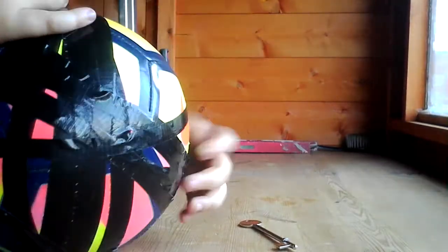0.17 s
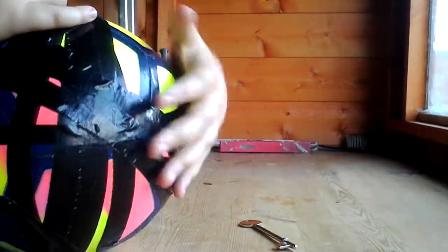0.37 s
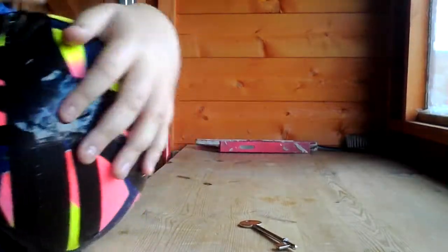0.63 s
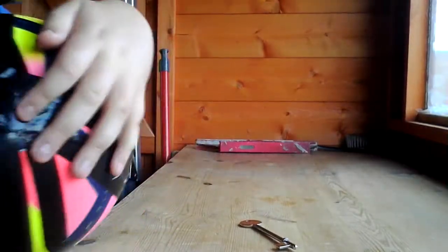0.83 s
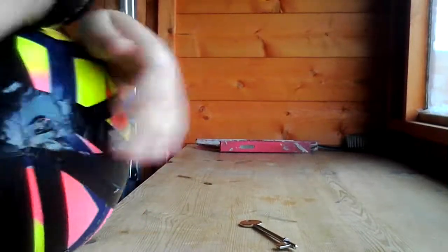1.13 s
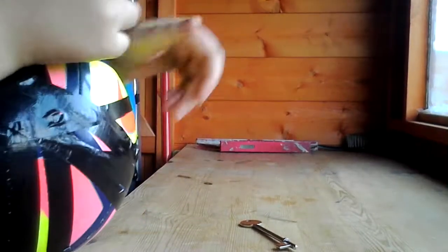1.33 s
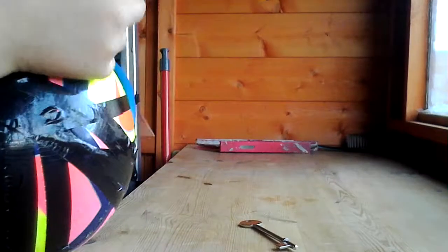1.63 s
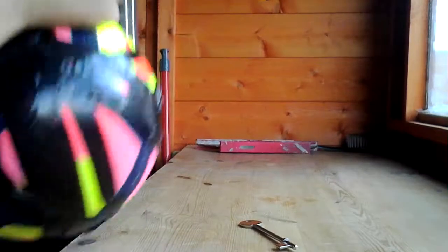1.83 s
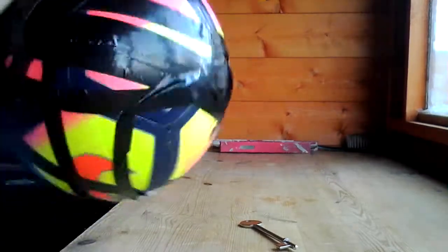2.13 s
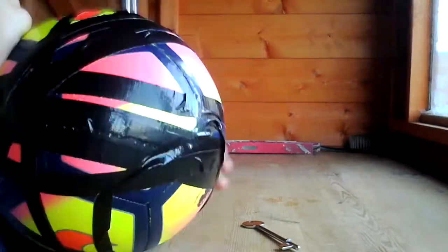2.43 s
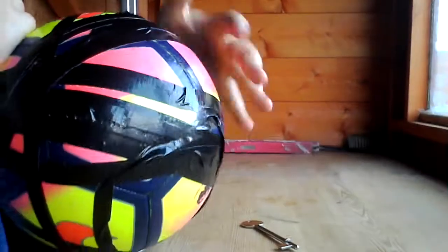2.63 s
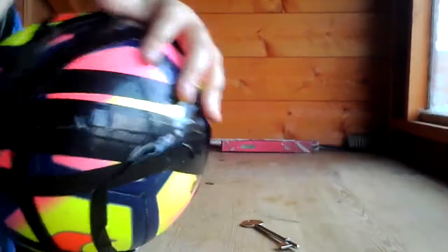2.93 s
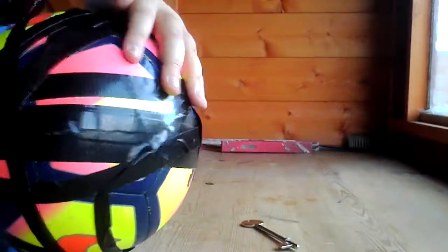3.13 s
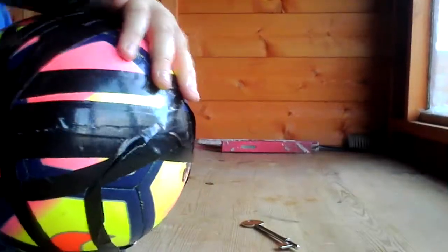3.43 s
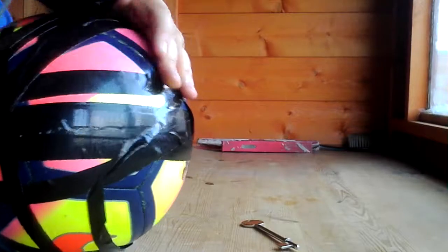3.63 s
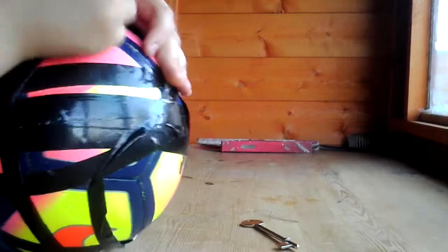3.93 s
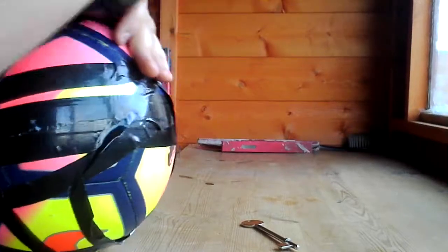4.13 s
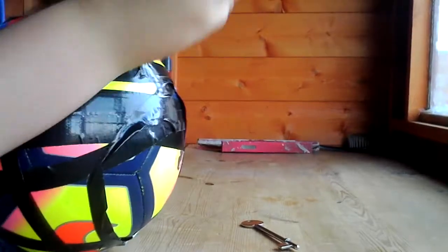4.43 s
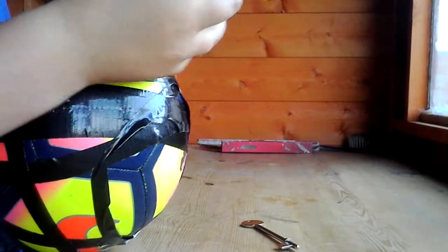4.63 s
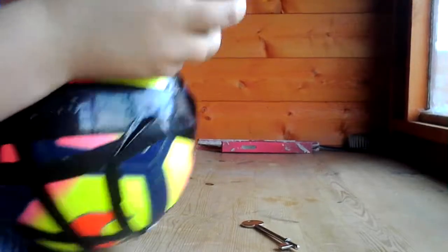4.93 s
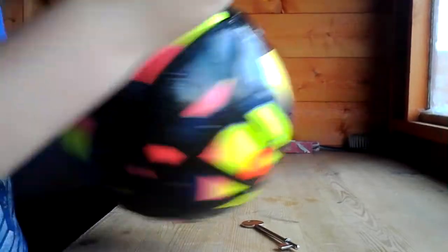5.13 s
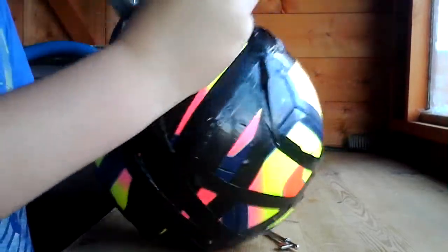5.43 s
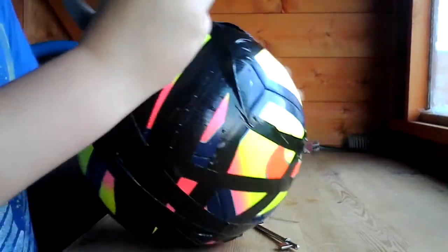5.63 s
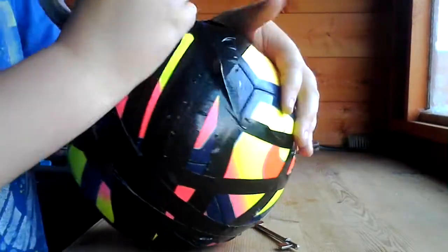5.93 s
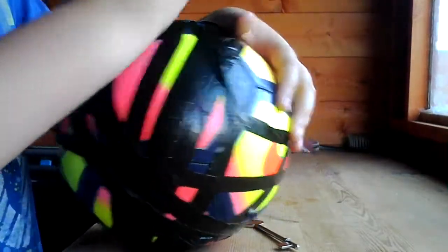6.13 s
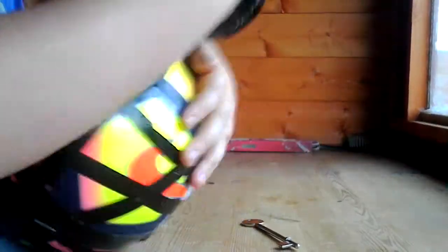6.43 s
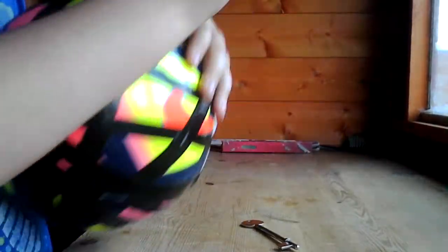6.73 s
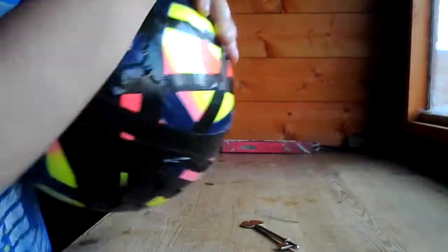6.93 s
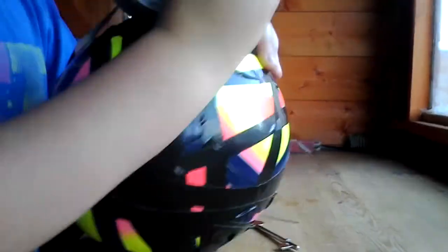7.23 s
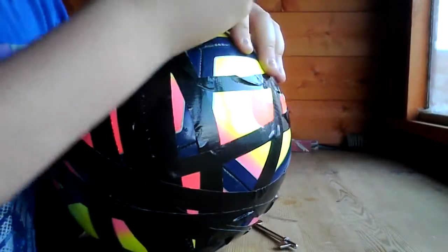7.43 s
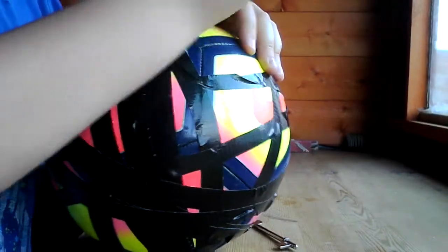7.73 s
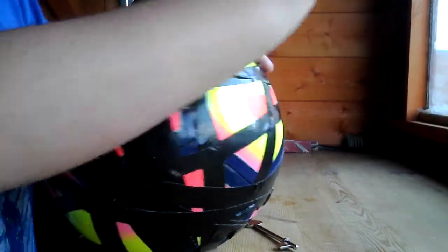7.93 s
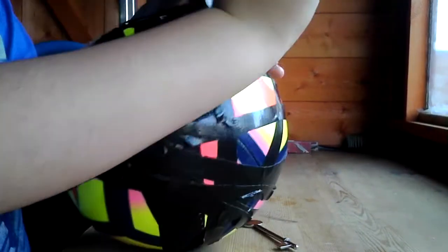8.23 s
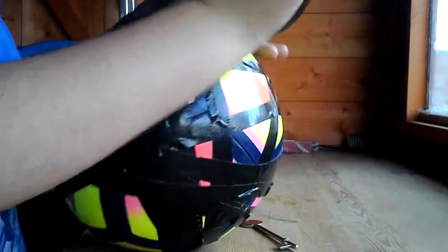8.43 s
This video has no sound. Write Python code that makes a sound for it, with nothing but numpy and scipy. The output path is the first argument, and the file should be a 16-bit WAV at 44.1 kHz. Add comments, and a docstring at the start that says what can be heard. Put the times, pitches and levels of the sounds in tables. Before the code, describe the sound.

Close in a small wooden shed, with low rumble, dull rush and faint hiss throughout. At first only very faint hand rubbing. At 0.8 s the slack tape jerks with dull snaps and a short crackling rip follows until about 1.0. Quiet rubbing and small creases lead to a ball being set on the bench at 2.5, a low thud with a scrape and swish. From 2.95 to 3.55 come four brisk rips, bright and crackling, with hard snaps and a drumming strip. Soft rubbing, then a faint skid and thin falling squeak near 4.0, a rip at 4.1 to 4.3 and a tiny one at 4.5. A soft thud at 5.0, then light brushing. Two strong rips at 6.2 and 6.4, swishes and hollow taps around 6.9, a firmer ball bump at 7.3, a last longer rip at 7.8 to 8.0, then quiet rubs and a swish at 8.5.

```python
"""Tape is pulled off a roll in short rips and wound round a football on a wooden bench in a small shed.
The glue lets go in sharp slips and a dense crackle, coloured noise that also drums on the taut strip.
Between rips, hands rub, crease and tap the tape, and the ball skids, squeaks and is bumped on the bench;
damped low tones make its thuds, filtered noise its clatter. Short echoes, hiss and rumble lie behind."""
import sys
import numpy as np
from scipy import signal
from scipy.fft import rfft, irfft
from scipy.io import wavfile
from scipy.ndimage import uniform_filter1d

SR = 44100
rng = np.random.default_rng(int(sys.argv[2]) if len(sys.argv) > 2 else 0)


def wav_out(sig):
    """Save sig, one row per channel (or a flat mono array), as 16-bit PCM at SR to the path in sys.argv[1]."""
    wavfile.write(sys.argv[1], SR, np.round(np.clip(np.atleast_2d(sig).T, -1, 1) * 32767).astype(np.int16))


N = 378378

# Colour of the taut strip. Each row: frequency in Hz, relative density in dB per Hz.
STRIP_COLOUR = [(60, -15), (160, -8), (330, -7), (520, -7), (730, -2), (920, -6.5), (1130, -5), (1350, -8),
                (1800, -8), (3000, -9), (8000, -22)]
# Colour of the glue letting go. Each row: frequency in Hz, relative density in dB per Hz.
GLUE_COLOUR = [(150, -18), (600, -9), (1500, -17), (2000, -13), (2500, -4.5), (4200, -2.5), (5400, 0.5),
               (6500, 2), (7300, -6), (8500, -8), (11800, -2), (15400, -12)]
# Colour of skin on tape and of creases. Each row: frequency in Hz, relative density in dB per Hz.
SWISH_COLOUR = [(300, -13), (1500, -11.5), (2500, -9), (3600, -4), (6200, 3), (8000, -11.5), (12000, -5.5),
                (15500, -16)]


def from_db(db):
    """Decibels to gain."""
    return 10 ** (np.asarray(db) / 20)


def unit_energy(x):
    """Scale so that the squares sum to one."""
    return x / np.sqrt(np.sum(x ** 2) + 1e-20)


def at_hz(points, hz):
    """Read a table on a log-frequency axis."""
    f, value = np.transpose(points)
    return np.interp(np.log(np.maximum(hz, 1)), np.log(f), value)


def add(out, s, sound):
    """Mix a sound in at time s."""
    i = max(round(s * SR), 0)
    out[i:i + len(sound)] += sound[:max(N - i, 0)]


def fade(t, t60):
    """Exponential decay by 60 dB in t60 seconds."""
    return np.exp(-np.log(1000) * t / t60)


def colour(x, spectrum, size=4096):
    """Causal (minimum-phase) filter with this spectrum; white noise keeps its power."""
    hz = np.arange(size // 2 + 1) * SR / size
    cepstrum = irfft(np.log(from_db(at_hz(spectrum, hz))))
    # folding the cepstrum forward in time makes the phase minimal
    cepstrum[1:size // 2] *= 2
    cepstrum[size // 2 + 1:] = 0
    response = unit_energy(irfft(np.exp(rfft(cepstrum))))
    return signal.oaconvolve(x, response)[:N]


def wander(per_s, count=1000):
    """Slow chance with a spread of about one, drawn per_s times a second and joined by straight lines."""
    return np.interp(np.arange(N) / SR * per_s, np.arange(count), rng.standard_normal(count))


def crackle(per_s, spread_db, size=1024):
    """Random clicks of uneven strength, evened to about unit power over some 20 ms."""
    sign = rng.choice([-1, 1], N)
    strength = from_db(spread_db * np.clip(rng.standard_normal(N), -2, 2)) * sign
    clicks = strength * (rng.random(N) < per_s / SR)
    power = np.abs(uniform_filter1d(clicks ** 2, size))
    return clicks / np.sqrt(power + 0.0013)


def cracks(rows, spectrum, crack_t60, rise_s=0.00049, size=512):
    """Each row is a rough burst that builds and dies within milliseconds, in the colour of what it shakes."""
    out, t = np.zeros(N), np.arange(size) / SR
    shape = np.minimum(t / rise_s, 1) * fade(t, crack_t60)
    for (s, db), grain in zip(rows, rng.standard_normal((len(rows), size))):
        burst = colour(np.tanh(2 * grain) * shape, spectrum, size=1024)
        add(out, s, from_db(db) * unit_energy(burst))
    return out


def stick_slip(per_s, jitter, slip_t60, steady, uneven_db=2.0, most=4.2, count=200):
    """Gain of a peel front that jumps unevenly at a changing rate and creeps between; about unit power."""
    timing, grip = rng.standard_normal((2, count))
    gaps = np.exp(jitter * timing)
    stored = gaps * from_db(uneven_db * grip) ** 2   # a longer or firmer stick stores more energy
    at = np.searchsorted(np.cumsum(per_s) / SR, np.cumsum(gaps))
    inside, energy = at < len(per_s), np.zeros(len(per_s))
    energy[at[inside]] = stored[inside] / stored.mean() * SR / per_s[at[inside]]
    keep = fade(2 / SR, slip_t60)   # power dies twice as fast as amplitude
    power = signal.lfilter([1 - keep], [1, -keep], energy)
    share = np.clip(steady, 0, 1)
    return np.minimum(np.sqrt(share + (1 - share) * power), most)   # cap the strongest slips


def tape(crackle_db=-4.0, drum_db=-4.5, snap_db=10.0, snap_drum_db=-1.5, q=4.0):
    """Glue threads snap and drum on the taut strip; the hand's speed sets slip rate and levels."""
    # Each row: start in seconds, length in seconds, time to top speed in seconds, slips per second at
    # top speed, breakaway snap in dB, glue crackle in dB, its swell with speed in dB, drumming of the
    # strip in dB, note of the strip in Hz, lift of that note in dB; all levels before the trims.
    pulls = [(.825, 0.14, .12, 229, -17, -23.5, 4.5, -27, 597, 8),
             (1.0014, .02, 0.0078, 117, -16, -28.5, 4, -40, 615, 0),
             (2.948, 0.12, 0.097, 233, -18, -22.5, 9, -29, 760, 4),
             (3.1535, 0.063, 0.048, 166, -4, -26.5, 2, -28, 900, -3.5),
             (3.3661, 0.052, 0.036, 150, -6.5, -36, 2, -27, 600, 1),
             (3.4886, 0.07, 0.073, 110, -7.5, -28.5, -4.5, -24, 775, -6.5),
             (4.117, 0.19, 0.029, 215, -15, -29.5, 1.5, -33, 1090, 2),
             (4.5058, 0.045, .04, 110, -19, -43.5, -14.5, -41.5, 1100, -9),
             (6.2069, 0.11, 0.083, 220, -8.5, -20, 6, -27, 750, 8),
             (6.419, 0.099, .09, 288, -4.5, -29, -8.5, -23, 710, .5),
             (7.8026, .198, .135, 233, -12.5, -30.5, 2, -28.5, 1020, 2.5)]
    # Loud snaps where the glue holds fast and lets go. Each row: start in seconds, level before trim in dB.
    snaps = list([(.9397, -16), (.9482, -12.5), (.9834, -16), (2.9928, -8.5), (3.0029, -10),
                  (3.0275, -10.5), (3.0563, -9), (3.0805, -6.5), (3.0913, -10), (3.1724, -6.5),
                  (3.182, -3.5), (3.2037, -8.5), (3.3906, -6), (3.4006, -12.5), (3.4155, -11),
                  (3.5226, -13), (3.552, -12.5), (4.1391, -16.5), (4.1473, -6.5), (4.2109, -18),
                  (4.248, -17), (4.2774, -17), (4.2953, -22), (4.5463, -21), (4.9849, -24), (6.1814, -14),
                  (6.1904, -16), (6.2824, -16), (6.2899, -13), (6.3, -13), (6.432, -13), (6.498, -15),
                  (6.509, -11), (7.7677, -24), (7.7967, -23), (7.8366, -16.5), (7.8468, -17.5),
                  (7.8573, -11.5), (7.9589, -11)])
    # after its peak the hand eases towards this share of top speed, and the sound fades over the release
    end_speed, release_s = .7, .008
    # a slow peel slips seldom and hardly shakes the strip
    slow_per_s, drum_swell_db = 85, 7.5
    glue, drum = np.zeros(N), np.zeros(N)
    threads = crackle(per_s=14000, spread_db=2.0)
    for (start, length, peak_s, top_per_s, breakaway, glue_level, swell,
         drum_level, note_hz, lift_db) in pulls:
        t = np.arange(int((length + release_s) * SR)) / SR
        speed = np.interp(t, [0, peak_s, max(length, peak_s) + release_s], [0, 1, end_speed])
        slips_per_s = slow_per_s + (top_per_s - slow_per_s) * speed
        slips = stick_slip(slips_per_s, jitter=.27, slip_t60=0.0036, steady=0.21)
        release = np.clip(1 - (t - length) / release_s, 0, 1)
        peel = threads[int(start * SR):][:len(t)] * slips * release
        note = signal.lfilter(*signal.iirpeak(note_hz, q, fs=SR), peel)
        strip = peel + (from_db(lift_db) - 1) * note
        add(glue, start, peel * from_db(glue_level + crackle_db + swell * (speed - 1)))
        strip_level = drum_level + drum_db - lift_db / 2 + drum_swell_db * (speed - 1)
        add(drum, start, strip * from_db(strip_level))
        snaps.append((start, breakaway))
    sharp = from_db(snap_db) * cracks(snaps, GLUE_COLOUR, crack_t60=0.003)
    drummed = from_db(snap_drum_db) * cracks(snaps, STRIP_COLOUR, crack_t60=0.0097)
    return colour(glue, GLUE_COLOUR) + colour(drum, STRIP_COLOUR) + sharp + drummed


def strip_jerks():
    """The slack strip jerks taut with dull snaps, each a short coloured burst."""
    # Each row: start in seconds, level in dB.
    jerks = [(.8046, -15.5), (.8136, -8.5)]
    # Colour of a jerk. Each row: frequency in Hz, relative density in dB per Hz.
    jerk_colour = [(200, -23), (550, -0.5), (1400, 2), (2500, -9.5), (3300, -17)]
    return cracks(jerks, jerk_colour, crack_t60=0.0053)


def tape_creases(crease_db=11.0):
    """Creases in the tape tick as they fold or are pressed, in the colour of the hand's swish."""
    # Each row: start in seconds, level before trim in dB.
    creases = [(.6409, -47), (1.9605, -40), (2.1567, -27), (2.4906, -25), (2.5095, -17.5), (2.7616, -32),
               (2.7726, -36), (2.9059, -27.5), (3.7146, -32), (3.7556, -34.5), (4.662, -40.5),
               (5.6562, -38), (5.9878, -34.5), (7.2726, -23.5), (7.3204, -30), (8.3126, -32)]
    return from_db(crease_db) * cracks(creases, SWISH_COLOUR, crack_t60=0.0046)


def bump(db, clatter_db, bright_hz, rise_s, t60, size=20000):
    """One bump: the thud of the low modes, and a clatter that swells and dies."""
    # Low modes of the ball on the bench. Each row: frequency in Hz, relative level in dB, t60 in seconds.
    modes = [(50, -15.5, 0.24), (67, -9, 0.13), (94, -6, 0.13), (130.4, -6.5, 0.11), (175, -16, 0.15),
             (232, -7.5, 0.099)]
    t = np.arange(size) / SR
    thud = sum(from_db(level) * np.sin(2 * np.pi * hz * t) * fade(t, ring) for hz, level, ring in modes)
    swell = np.minimum(t / rise_s, fade(np.maximum(t - rise_s, 0), t60))
    burst = rng.standard_normal(size) * swell
    low_pass = signal.butter(2, min(bright_hz, SR / 4), fs=SR, output="sos")
    clatter = signal.sosfilt(low_pass, burst)
    # narrower bands are raised to hold the power
    return from_db(db) * thud, from_db(db + clatter_db) * np.sqrt(SR / 2 / bright_hz) * clatter


def ball(thud_db=-1.0):
    """A landing is a touch, a blow, a drag and a dull rock back; soft low thuds sound on their own."""
    # The ball is set down on the bench. Each row: start in seconds, blow in dB, drag in dB,
    # drag brightness in Hz, drag rise in seconds; levels before colour and trim.
    landings = [(2.489, -32.5, -23.5, 2650, 0.034), (7.27, -26.5, -25.5, 1126, 0.015)]
    # Soft low thuds with a dull, swelling clatter. Each row: start in seconds, thud in dB, clatter in dB,
    # rise in seconds; levels before colour and trim.
    soft_thuds = [(1.0, -40.5, -58, 0.076), (2.84, -37.5, -47.5, .075), (3.39, -34, -48, .005),
                  (3.528, -33, -57, 0.0034), (4.969, -40, -54, 0.0088)]
    # Colour of the clatter. Each row: frequency in Hz, relative density in dB per Hz.
    bench_colour = [(40, -7.5), (130, -2), (240, -2.5), (380, -1.5), (650, -1.5), (1000, -4), (1600, -4.5),
                    (3000, -5.5), (7000, -5), (15000, -21.5)]
    settle_s, drag_s, rock_s = .019, .046, .115   # delays after the touch
    touch_db, rock_db = -5.5, -2   # against the blow
    bumps, thuds, clatter = [], np.zeros(N), np.zeros(N)
    for s, blow, drag, drag_hz, drag_rise in landings:
        bumps += [
            (s, bump(blow + touch_db, clatter_db=-6.5, bright_hz=820, rise_s=0.0011, t60=0.062)),
            (s + settle_s, bump(blow, clatter_db=-10.0, bright_hz=930, rise_s=0.0043, t60=0.19)),
            (s + drag_s, bump(drag, clatter_db=-12.5, bright_hz=drag_hz, rise_s=drag_rise, t60=0.14)),
            (s + rock_s, bump(blow + rock_db, clatter_db=-17.5, bright_hz=550, rise_s=.003, t60=0.17))]
    for s, db, rattle, rise in soft_thuds:
        bumps.append((s, bump(db, clatter_db=rattle - db, bright_hz=801, rise_s=rise, t60=0.28)))
    for s, (low, rattle) in bumps:
        add(thuds, s, low)
        add(clatter, s, rattle)
    return from_db(thud_db) * thuds + colour(clatter, bench_colour)


def finger_taps(tap_db=12.5):
    """Fingers tap the ball: short bursts in a hollow, dull colour."""
    # Each row: start in seconds, level before trim in dB.
    taps = [(4.9849, -37), (5.654, -40), (6.902, -32.5), (7.023, -32), (8.503, -41.5)]
    # Colour of a tap. Each row: frequency in Hz, relative density in dB per Hz.
    tap_colour = [(150, -9), (500, -2), (760, 4), (1000, -9), (1350, -15.5), (2300, -23), (3200, -13.5),
                  (8000, -47)]
    return from_db(tap_db) * cracks(taps, tap_colour, crack_t60=0.019, rise_s=0.00069)


def hands(attack_s=0.009, release_s=0.013, droop_db=-2.5, swish_db=-3.0, hollow_db=-5.5,
          uneven_db=4.0, fidget_hollow_db=-7.0):
    """Skin catches on the tape in fine grains under uneven pressure, and the hollow ball answers."""
    # Firm strokes of a hand over the tape. Each row: start in seconds, length in seconds,
    # swish in dB, hollow body in dB; levels before the trims.
    rubs = [(.176, .17, -67, -83), (0.439, 0.095, -54, -80), (0.518, 0.28, -63.5, -87),
            (1.209, 0.32, -62.5, -85), (1.804, 0.034, -50, -66), (1.9, 0.13, -57.5, -63),
            (2.147, 0.036, -54, -75), (2.481, 0.032, -39, -45), (2.819, 0.031, -42, -50),
            (3.646, 0.26, -61, -80), (3.93, 0.29, -61.5, -52.5), (4.462, .05, -57.5, -57),
            (4.6, 0.25, -65.5, -61.5), (5.531, 0.032, -60, -57), (5.646, 0.083, -55.5, -59),
            (5.961, .069, -56, -56.5), (6.382, 0.087, -42, -55), (6.603, 0.11, -47, -56),
            (6.785, .13, -58.5, -66), (6.916, .065, -49, -53.5), (7.007, 0.07, -58, -54.5),
            (7.317, 0.15, -60, -45), (7.692, 0.13, -62, -76), (8.095, 0.19, -64, -61.5),
            (8.486, 0.045, -45, -54)]
    # Colour of the hollow ball. Each row: frequency in Hz, relative density in dB per Hz.
    hollow_colour = [(120, -26), (400, 1.5), (600, 0), (740, 4), (950, -6), (1300, -6.5), (1800, -19.5),
                     (2600, -12.5), (6000, -52)]
    # a faint shifting grip runs all through, under the strokes
    fidget_db, fidget_spread_db, fidgets_per_s = -87, 5, 9
    swish = from_db(fidget_db + fidget_spread_db * wander(per_s=fidgets_per_s))
    hollow = from_db(fidget_hollow_db) * swish
    for start, length, swish_level, hollow_level in rubs:
        t = np.arange(int(length * SR)) / SR
        edges = np.clip(np.minimum(t / attack_s, (length - t) / release_s), 0, 1)
        stroke = edges * from_db(droop_db * t / length)
        add(swish, start, stroke * from_db(swish_level + swish_db))
        add(hollow, start, stroke * from_db(hollow_level + hollow_db))
    grains = crackle(per_s=5000, spread_db=7.0) * from_db(uneven_db * wander(per_s=38))
    return colour(swish * grains, SWISH_COLOUR) + colour(hollow * grains, hollow_colour)


def skids(skid_db=-4.5, q=6.1):
    """The ball skids softly against skin and wood: friction noise gathered round one pitch."""
    # Each row: start in seconds, length in seconds, level before trim in dB, centre in Hz.
    skid_rows = [(1.438, 0.079, -61, 1290), (3.959, 0.19, -54, 1754), (5.15, 0.32, -70, 1607),
                 (7.476, 0.0092, -47, 1120), (7.512, 0.011, -55.5, 1190)]
    out = np.zeros(N)
    for s, length, db, hz in skid_rows:
        n = int(length * SR)
        peak = np.concatenate(signal.iirpeak(hz, q / 2, fs=SR))
        rub = signal.sosfilt(np.tile(peak, (2, 1)), rng.standard_normal(SR)[:n])   # two peaks in a row
        shaped = unit_energy(rub * signal.windows.tukey(n, .5))
        add(out, s, from_db(db + skid_db) * np.sqrt(n) * shaped)
    return out


def squeak(db=-61.0, waver=.015, flutter_db=3.5):
    """Skin sticks and slips on the ball fast enough for a thin, unsteady tone that sinks in pitch."""
    # One row: start in seconds, length in seconds, first pitch in Hz, last pitch in Hz, before the waver.
    s, length, first_hz, last_hz = (3.99, .14, 1800, 1560)
    out, n = np.zeros(N), int(length * SR)
    hz = np.geomspace(first_hz, last_hz, n) * (1 + waver * wander(per_s=200)[:n])
    level = from_db(db + flutter_db * wander(per_s=46)[:n]) * signal.windows.tukey(n, .5)
    add(out, s, level * np.sqrt(2) * np.sin(2 * np.pi * np.cumsum(hz) / SR))
    return out


def ball_ring(x, size=11025, t60=.12):
    """The hollow ball rings along briefly with whatever shakes its skin: a sum of damped modes."""
    # Resonances of the ball and the air inside it. Each row: frequency in Hz, relative level in dB.
    ring_modes = [(501, -11.5), (723, -8.5), (1139, -4), (1783, -8.5), (2054, -5), (2373, -1.5), (2488, -5)]
    t = np.arange(size) / SR
    decay = fade(t, t60)
    tones = sum(from_db(db) * 2 * np.cos(2 * np.pi * hz * t) for hz, db in ring_modes)
    rings = tones * decay / np.sum(decay)
    return x + signal.oaconvolve(x, rings)[:N]


def shed(x, wet_db=-5.0, early_db=-7.0, early_t60=0.027, size=22050):
    """Quick echoes off the bench and near boards, then a short diffuse tail that dies band by band."""
    # Reverberation of the shed. Each row: frequency in Hz, t60 in seconds.
    decays = [(100, 0.48), (500, 0.26), (1500, 0.25), (6000, 0.2), (14000, 0.19)]
    t, edges, tail = np.arange(size) / SR, np.geomspace(40, 17000, num=10), 0
    white = rng.standard_normal((2, size))
    for k, (low, high) in enumerate(zip(edges, edges[1:])):
        band_pass = signal.butter(2, [low, high], "band", fs=SR, output="sos")
        band = signal.sosfilt(band_pass, white[k % 2])   # neighbouring bands use different noise
        tail = tail + band * fade(t, at_hz(decays, np.sqrt(low * high)))
    tail = unit_energy(tail * np.clip(t / 0.0022, 0, 1))
    echoes = rng.standard_normal(size) * (rng.random(size) < 5000 / SR)   # about 5000 a second
    early = unit_energy(echoes * (t > .001) * fade(t, early_t60))
    return signal.oaconvolve(x, from_db(wet_db) * tail + from_db(early_db) * early)[:N]


def background(hiss_db=-70.0, rumble_db=3.5, rush_db=0.5, waver_db=2.5):
    """A steady hiss, a wavering low rumble and a dull rush that swells slowly, all coloured noise."""
    # Slow levels, one curve for each lull. Each row: time in seconds, rumble in dB, rush in dB, before trims.
    lulls = [
        [(0.0, -59, -62), (0.064, -64.5, -74.5), (0.78, -59.5, -68.5)],
        [(1.15, -68, -68), (2.17, -60.5, -65.5), (2.45, -70, -65.5)],
        [(3.65, -60.5, -57), (5.44, -61, -58.5), (6.15, -60, -59)],
        [(6.68, -58.5, -54.5), (7.114, -62.5, -57.5), (7.25, -58, -58.5)],
        [(8.08, -59.5, -63), (8.368, -64.5, -61.5), (8.58, -66, -61)],
    ]
    # Colour of the hiss. Each row: frequency in Hz, relative density in dB per Hz.
    hiss_colour = [(100, 5), (500, 1), (1500, -4), (3000, -9), (5000, -5.5), (6500, -6.5), (7800, -25),
                   (15000, -26.5)]
    # Colour of the rumble. Each row: frequency in Hz, relative density in dB per Hz.
    rumble_colour = [(20, -21), (40, -7.5), (68, 4), (90, -3.5), (110, -12), (140, -10.5), (200, -20),
                     (400, -36.5), (1500, -53)]
    # Colour of the rush. Each row: frequency in Hz, relative density in dB per Hz.
    rush_colour = [(80, -6.5), (160, 1), (220, 5.5), (330, -9), (550, -11), (850, -9.5), (1200, -18.5),
                   (1800, -22.5), (3500, -29.5), (9000, -38.5)]
    s, *levels = np.concatenate(lulls).T
    rumble, rush = [from_db(np.interp(np.arange(N) / SR, s, level)) for level in levels]
    rumble = rumble * from_db(rumble_db + waver_db * wander(per_s=19))
    white = rng.standard_normal((3, N))
    hiss = from_db(hiss_db) * colour(white[0], hiss_colour)
    low = rumble * colour(white[1], rumble_colour)
    return hiss + low + from_db(rush_db) * rush * colour(white[2], rush_colour)


def scene(sway_hz=2.5):
    """Tape, ball and hands sound close by; the shed's echoes sway between two patterns as they move about."""
    tape_sounds = tape() + strip_jerks() + tape_creases()
    ball_sounds = ball() + finger_taps() + hands() + skids() + squeak()
    close = ball_ring(tape_sounds + ball_sounds)
    place = 2 * np.pi * sway_hz * np.arange(N) / SR
    echoes = shed(close * np.cos(place)) + shed(close * np.sin(place))
    return (close + echoes + background())[None]


def record(dry, low_cut_hz=36, cutoff_hz=15600):
    """The deepest bass is taken out, and the top is cut steeply."""
    lean = signal.sosfilt(signal.butter(2, low_cut_hz, "high", fs=SR, output="sos"), dry)
    return signal.sosfilt(signal.ellip(10, .2, 80, cutoff_hz, fs=SR, output="sos"), lean)


dry = scene()
out = record(dry)
wav_out(out)
```